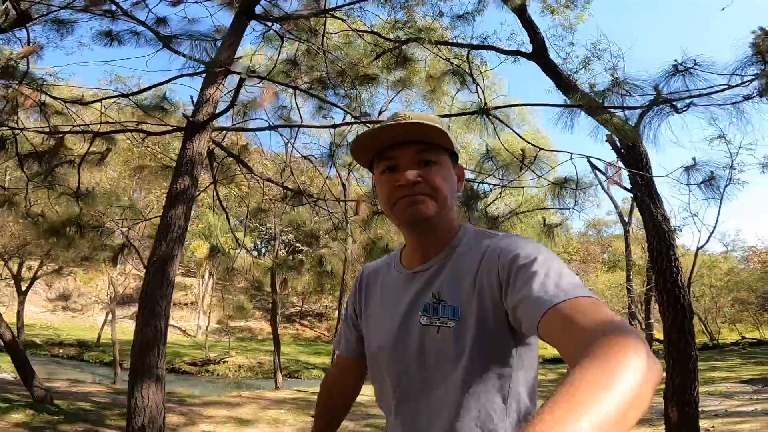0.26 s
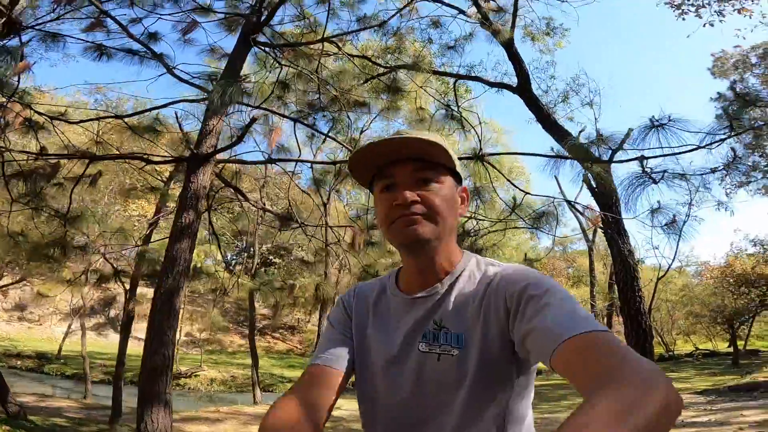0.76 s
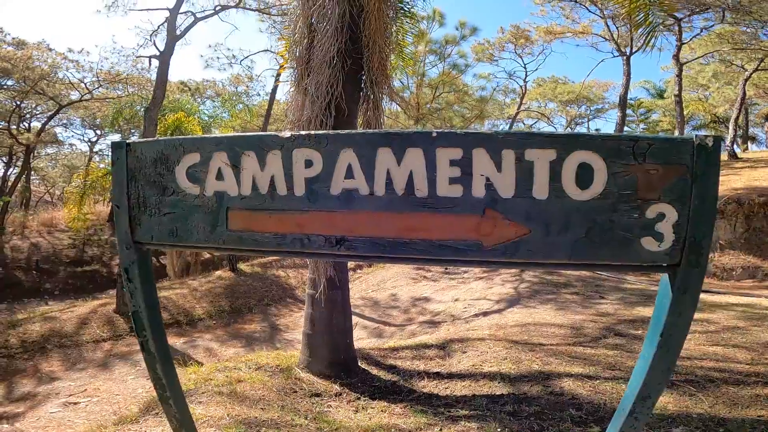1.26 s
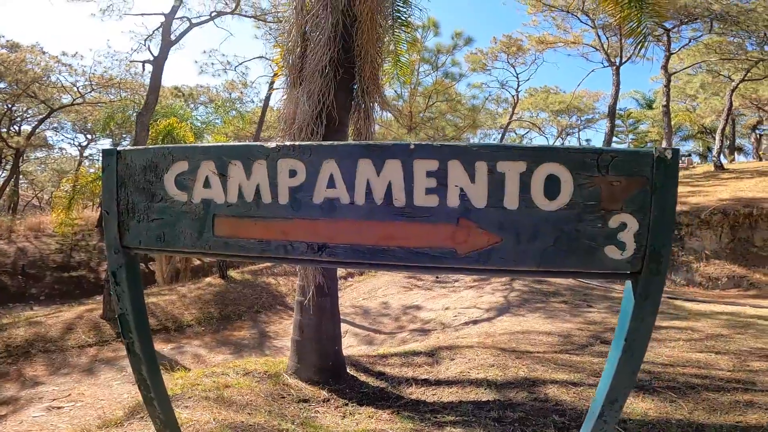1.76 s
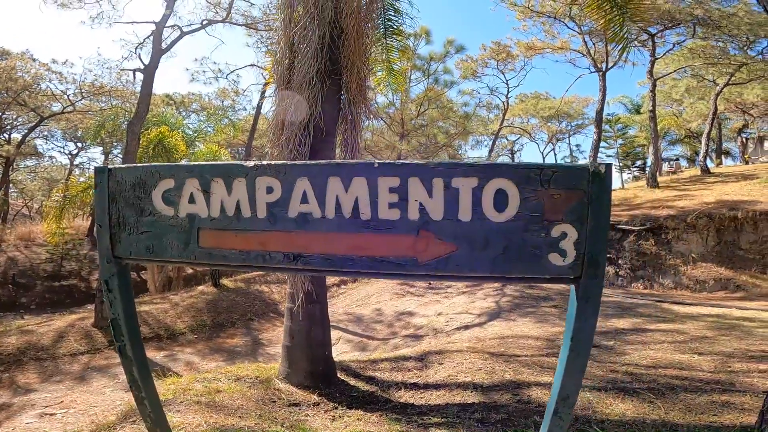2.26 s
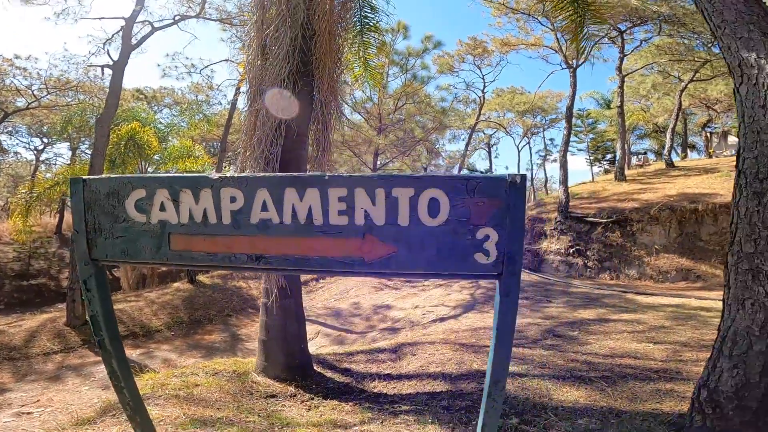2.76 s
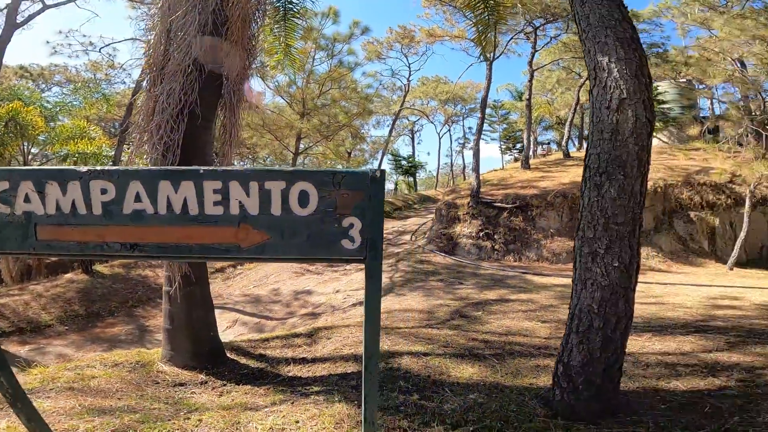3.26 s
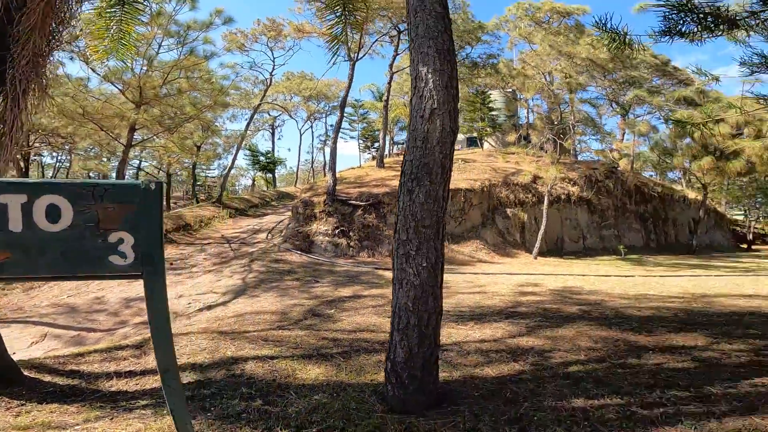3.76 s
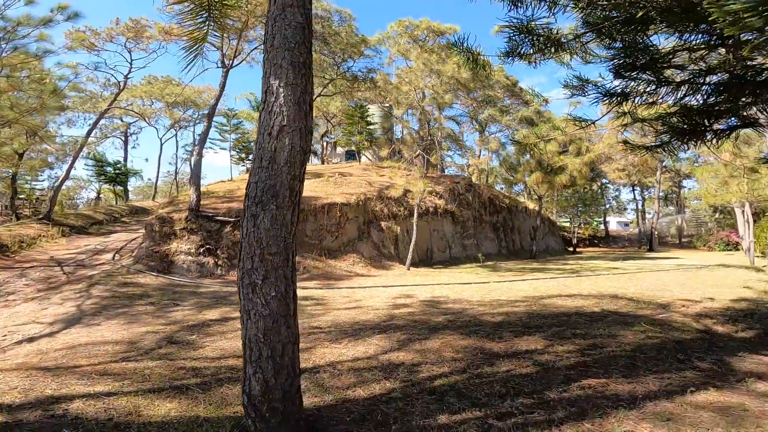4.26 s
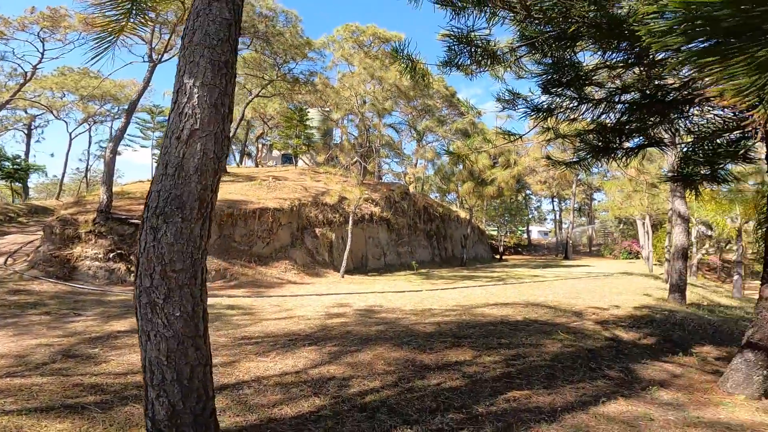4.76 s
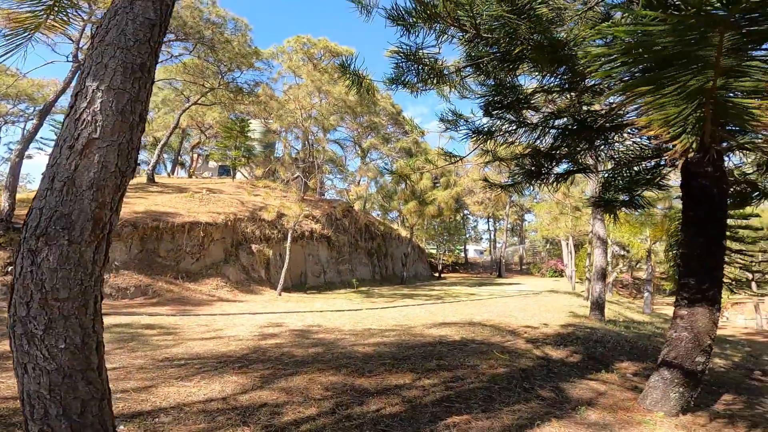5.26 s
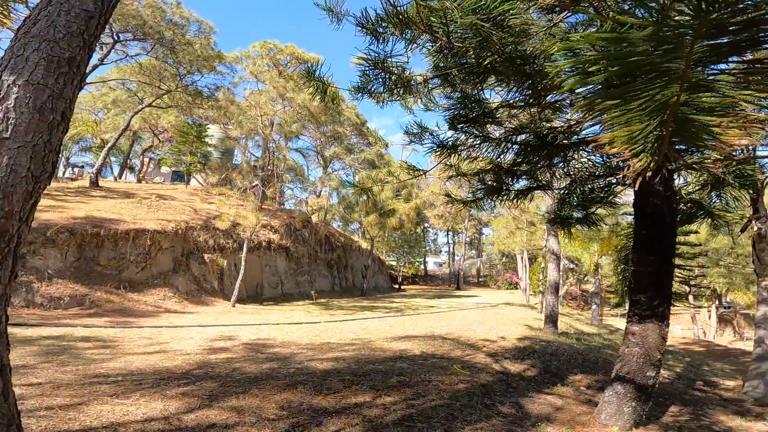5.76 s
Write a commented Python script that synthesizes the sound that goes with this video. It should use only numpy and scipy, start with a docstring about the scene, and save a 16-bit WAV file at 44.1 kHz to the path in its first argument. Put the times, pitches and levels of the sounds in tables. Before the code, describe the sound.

A small engine-driven water pump runs close to the microphone from the start, chugging fast and evenly. Its low exhaust puffs sit in the centre, while a ringing metal clatter and bright valve ticks come slightly from the left. At about 0.9 seconds the sound cuts off abruptly into silence. At about 1.1 seconds the pump returns from far across the park, much quieter, a soft low hum straight ahead that wavers slightly and continues to the end, at about 6 seconds. A soft gust in the pines comes in with it and dies away by about 2.5 seconds, leaving a low air rumble and light hiss. Two very faint, thin, high whistles rise and fall, around 1.4 to 2.2 seconds and 4.3 to 5 seconds. From about 4.5 seconds a faint dry rattle, perhaps an insect, slowly grows.

```python
"""A small engine-driven water pump chugs in a park: two puffs of gas and a burst of valve clatter a cycle.
The microphone stands close by at first, the ringing metal off to its left. The sound cuts off, and the
pump returns from far away, a soft hum straight ahead under a dying gust in the pines.
Two faint high whistles pass, and a dry rattle, perhaps an insect, grows near the end."""
import sys
import numpy as np
from scipy import signal
from scipy.fft import rfft, irfft, next_fast_len
from scipy.io import wavfile
from scipy.ndimage import uniform_filter1d, map_coordinates

SR = 44100
rng = np.random.default_rng(int(sys.argv[2]) if len(sys.argv) > 2 else 0)


def wav_record(signal):
    """Record a signal, one row per channel, as 16-bit PCM in the file named by sys.argv[1]."""
    frames = np.transpose(np.atleast_2d(signal))
    bounded = np.clip(frames, -1, 1)
    # unit amplitude maps onto the largest positive 16-bit level
    quanta = np.round(bounded * 32767).astype(np.int16)
    wavfile.write(sys.argv[1], SR, quanta)


N = 264952
TIME = np.arange(N) / SR

# when the close and the distant microphone positions are heard: time_s, gain
NEAR_FADE = [(.928, 1), (.944, 0)]
FAR_FADE = [(1.09, 0), (1.11, .1), (1.155, 1)]
# spectra of low wind and of fine treetop hiss: frequency_hz, level_db
RUMBLE_SPECTRUM = [(8, -3), (22, -8.5), (45, -3.5), (80, -7), (130, -11.5), (200, -16), (300, -44),
                   (600, -71.5)]
HISS_SPECTRUM = [(3500, -25), (6500, -2), (8000, -6), (9800, 2), (11000, 0), (12200, 5), (13000, -11),
                 (14000, -17)]
# metal contacts in each engine cycle: after_firing_cycles, level_db, t60_s
VALVE_CONTACTS = [(.272, -.3, .045), (.405, -5, .09), (.895, -10, .06)]


def amp(db):
    """Decibels to gain."""
    return 10 ** (np.asarray(db) / 20)


def unit(x):
    """Scale to rms 1."""
    return x / np.sqrt(np.mean(x ** 2) + 1e-20)


def along(points, hz):
    """Read (frequency_hz, value) points on a log axis."""
    knots_hz, values = np.transpose(points)
    return np.interp(np.log(hz + 1), np.log(knots_hz + 1), values)


def curve(points):
    """Read (time_s, value) points at every sample."""
    return np.interp(TIME, *np.transpose(points))


def wobble(rate):
    """A smooth random curve, rate knots a second."""
    return map_coordinates(rng.standard_normal(int(N * rate / SR) + 4), [TIME * rate])


def swell(peak_s, half_length_s):
    """A smooth bump from 0 to 1 and back."""
    return np.exp(-((TIME - peak_s) / half_length_s) ** 2)


def growing(start_s, rise_s, db, db_per_s):
    """A gain that fades in and keeps climbing."""
    return np.clip((TIME - start_s) / rise_s, 0, 1) * amp(db + db_per_s * (TIME - start_s))


def filtered(x, response):
    """x through a complex response of frequency."""
    size = next_fast_len(N + SR // 2)
    return irfft(rfft(x, size) * response(np.fft.rfftfreq(size, 1 / SR)), size)[..., :N]


def coloured(x, spectrum):
    """x given a spectrum, at rms 1."""
    return unit(filtered(x, lambda hz: amp(along(spectrum, hz))))


def rush(spectrum, patchy_db):
    """Noise of rms 1 with drifting patches of gain."""
    bins = signal.stft(rng.standard_normal(N), nperseg=512)[2]
    patches = uniform_filter1d(rng.standard_normal(bins.shape), size=6, axis=0)
    patches = unit(uniform_filter1d(patches, size=14, axis=1))
    return coloured(signal.istft(bins * amp(patchy_db * patches), nperseg=512)[1][:N], spectrum)


def blows(turns, scatter_db):
    """One impulse of uneven size each time the count passes a whole number."""
    at = np.flatnonzero(np.diff(np.floor(turns)) > 0)
    train = np.zeros(N)
    train[at] = amp(scatter_db * rng.standard_normal(len(at)))
    return train


def bursts(train, rise_s, t60_s):
    """The envelope that each impulse leaves: a quick rise and a decay."""
    t = TIME[:SR // 4]
    return signal.fftconvolve(train, (1 - np.exp(-t / rise_s)) * amp(-60 * t / t60_s))[:N]


def ebb(db_per_s):
    """A steady fall in dB, counted from the start of the distant scene."""
    return -db_per_s * (TIME - FAR_FADE[0][0])


def gust():
    """Wind strength in dB over the calm: one gust holds, then dies away."""
    held_db, hold_until_s, fall_db_per_s = 9.5, 1.32, 8.5
    return np.clip(held_db - fall_db_per_s * (TIME - hold_until_s), 0, held_db)


def wind_in_pines():
    """Air rumbles low down, rushes through the trees and hisses in the needles."""
    # spectra of the air in the trees and in the needles: frequency_hz, level_db
    breeze_spectrum = [(140, -18), (230, 2.5), (238, -15), (265, -3.5), (471, -1.5), (557, 0.5),
                       (716, -1.5), (1500, -12.5), (2000, -14.5), (4000, -31.5), (5200, -49), (8800, -120)]
    needle_spectrum = [(1200, -1.5), (2300, 1), (3300, -3), (4500, -5.5), (6500, -10.5), (8000, -15),
                       (10000, -23), (12300, -39), (14000, -42)]
    # light stirs that reach only the crowns: peak_s, half_length_s, level_db
    stirs = [(2.92, 0.1, 0.8), (3.556, 0.72, 3.5), (5.7, 1.45, 4.5)]
    gust_db, eddy_db = gust(), .5 * wobble(4.97)
    stir_db = sum(db * swell(peak_s, half_length_s) for peak_s, half_length_s, db in stirs)
    breeze_gain = amp(-56 + .89 * gust_db + eddy_db)
    rumble = amp(-48 + .15 * gust_db + ebb(db_per_s=.5)) * rush(RUMBLE_SPECTRUM, patchy_db=3.5)
    breeze = breeze_gain * rush(breeze_spectrum, patchy_db=1.4)
    needles = amp(-68.5 + .52 * gust_db + stir_db + eddy_db) * rush(needle_spectrum, patchy_db=1.5)
    treetops = amp(-97 + 2.4 * stir_db) * np.array([rush(HISS_SPECTRUM, patchy_db=1.5) for _ in range(2)])
    # near the end the air opens to both sides of the microphone
    side = breeze_gain * rush(breeze_spectrum, patchy_db=-1)
    side += amp(-49.5) * rush(RUMBLE_SPECTRUM, patchy_db=1)
    side *= growing(start_s=4.14, rise_s=.26, db=-31.5, db_per_s=9.5)
    return rumble + breeze + needles + treetops + np.array([side, -side])


def whistles():
    """Faint, fluttering tones arch high above the breeze and break into chirps, with a little hiss."""
    # thin whistles: start_s, length_s, top_hz, level_db
    arches = [(1.426, 0.81, 11700, -89), (4.25, 0.75, 11850, -89)]
    sag_hz, hiss_db = 2900, 3
    sound = np.zeros(N)
    for start_s, length_s, top_hz, db in arches:
        arch = 1 - np.clip(2 * (TIME - start_s) / length_s - 1, -1, 1) ** 2
        pitch_hz = (top_hz - sag_hz * (1 - arch)) * (1 + .01 * wobble(600) + .008 * wobble(30))
        flutter = wobble(90) * amp(2.5 * wobble(15))
        tone = unit(flutter * np.sin(2 * np.pi * np.cumsum(pitch_hz) / SR))
        hiss = amp(hiss_db) * rush(HISS_SPECTRUM, patchy_db=2)
        sound += amp(db) * (arch ** .25 * tone + arch * hiss)
    return sound


def rattle():
    """Dry ticks at an uneven rate over a narrow buzz, perhaps an insect."""
    # the band of the buzz: frequency_hz, level_db
    buzz_spectrum = [(2500, -42), (3500, -4), (4200, 2), (4900, -2.5), (5600, -9.5), (7000, -11.5),
                     (8500, -54), (12000, -39)]
    ticks_per_s = 28 * amp(2 * wobble(25))
    ticks = blows(np.cumsum(ticks_per_s) / SR, scatter_db=1.8)
    envelope = .28 + bursts(ticks, rise_s=.003, t60_s=.045)
    gain = growing(start_s=4.5, rise_s=.57, db=-72, db_per_s=3.6)
    return gain * coloured(envelope * rng.standard_normal(N), buzz_spectrum)


def engine_cycles(speed, firing_s):
    """Engine cycles counted from one firing."""
    turns = np.cumsum(curve(speed)) / SR
    return turns - np.interp(firing_s, TIME, turns)


def hum(turns, orders, unsteady_db, intake_lag, intake_share, shift_rad, pipe_order, half_width):
    """Exhaust and intake puff intake_lag cycles apart; orders lag as they pass the pipe's resonance."""
    note = np.zeros(N)
    for order, db in orders:
        puff_phase = np.angle(-1 - intake_share * np.exp(-2j * np.pi * order * intake_lag))
        phase = puff_phase + shift_rad - 2 * np.arctan((order - pipe_order) / half_width)
        note += amp(db + unsteady_db * wobble(7.5)) * np.cos(2 * np.pi * order * turns + phase)
    return unit(note)


def far_pump():
    """From afar only the low puffs reach the microphone, wavering and carried a little by the gust."""
    # engine speed: time_s, cycles_per_s
    speed = [(1.1, 19.43), (2.6, 19.43), (2.95, 19.59), (3.3, 19.47), (3.8, 19.46), (4.3, 19.38),
             (5.1, 19.4), (5.35, 19.2), (5.7, 19.42)]
    # the exhaust note at a distance: cycle_rate_multiple, level_db
    exhaust_orders = [(1, -11), (2, -7), (3, -1), (4, -6), (5, 0), (6, -5), (7, -10), (8, -1), (9, -11),
                      (10, -14), (11, -13), (12, -24), (13, -27), (14, -27)]
    turns = engine_cycles(speed, firing_s=1.3053)
    note = hum(turns, exhaust_orders, unsteady_db=.5,
               intake_lag=.357, intake_share=.96, shift_rad=-2.52, pipe_order=9.7, half_width=.5)
    return amp(-40.5 + ebb(db_per_s=.5) + .13 * gust()) * note


def to_left(pair):
    """Place a stereo pair to the left of the microphone, at rms 1."""
    # balance of the close metal: frequency_hz, left_minus_right_db
    balance = [(150, 0.9), (360, 3), (660, 7), (1200, 6.5), (2180, 8.5), (3970, 6), (7230, 2.6),
               (13200, 6.7)]
    return unit(filtered(pair, lambda hz: amp(np.outer([.5, -.5], along(balance, hz)))))


def engine_block(hz):
    """The response of the ringing block: resonances of alternating sign."""
    # block resonances: centre_hz, width_hz, level_db
    resonances = [(710, 120, 4), (964, 23, 1.5), (1470, 160, -5), (1980, 100, 15.5), (3120, 70, -7.5),
                  (4000, 37, -17.5), (4560, 170, 1), (5460, 66, -21), (6900, 100, -15), (7660, 30, -21)]
    return sum((-1) ** k * amp(db) * 1j * hz * width / (centre ** 2 - hz ** 2 + 1j * hz * width)
               for k, (centre, width, db) in enumerate(resonances))


def metal_modes(train, t60_s, count):
    """Each blow sets a new handful of the many close modes of the metal parts ringing."""
    t = TIME[:SR // 16]
    envelope = amp(-60 * t / t60_s) * np.minimum(t / .001, 1)
    sound = np.zeros((2, N + len(t)))
    for at in np.flatnonzero(train[:round(NEAR_FADE[-1][0] * SR)]):
        hz = rng.uniform(1200, 8000, (count, 1))
        sizes = rng.exponential(size=(2, count))
        phase = rng.uniform(0, 2 * np.pi, (count, 1))
        sound[:, at:at + len(t)] += train[at] * sizes @ np.sin(2 * np.pi * hz * t + phase) * envelope
    return sound[:, :N] / np.sqrt(count)


def valve_clatter(turns, puffs):
    """Valve gear rattles over the steady churn of the pump and rings the block."""
    # spectrum of the clatter: frequency_hz, level_db
    clatter_spectrum = [(260, -14.5), (450, -6.5), (519, -7), (690, -4.5), (843, -7), (958, -6),
                        (1330, -4.5), (1450, -4), (2710, -8.5), (3040, -6), (4730, -10), (7580, -14),
                        (10200, -27), (12000, -25), (13600, -42.5)]
    # how alike left and right are at the microphone: frequency_hz, correlation
    likeness = [(300, -0.2), (600, 1), (1310, 1), (2820, 0.5), (6090, 0.9), (13200, -0.2)]
    # where the casing sings: cycle_rate_multiple, level_db
    casing_orders = [(25, -7), (32, -4.5), (33, -4.5), (35, -6), (37, -3), (39, -1), (49, 4.5), (51, -1),
                     (77, -11)]
    churn_db, modes_db, ring_db, knock_db = -11, -7.5, -7, -13.5

    def mid_side_gains(hz):
        spread = np.arccos(np.clip(along(likeness, hz), -1, 1)) / 2
        return np.array([np.cos(spread), np.sin(spread)])

    trains = [amp(db) * blows(turns - delay, scatter_db=.9) for delay, db, _ in VALVE_CONTACTS]
    power = sum(bursts(train, rise_s=.0012, t60_s=t60_s) ** 2
                for train, (_, _, t60_s) in zip(trains, VALVE_CONTACTS))
    grit = np.sqrt(power + amp(churn_db) ** 2) * amp(1.5 * wobble(500)) * rng.standard_normal((2, N))
    grit += amp(modes_db) * metal_modes(trains[0], t60_s=.07, count=30)
    pair = coloured(grit, clatter_spectrum) + amp(ring_db) * unit(filtered(grit, engine_block))
    mid, side = filtered(pair, mid_side_gains)
    # knocks and casing repeat alike in every cycle, so they sound as tones among the noise
    knocks = unit(filtered(sum(trains), lambda hz: engine_block(hz) / (1 + 1j * hz / 900)))
    casing = hum(turns, casing_orders, unsteady_db=-1, **puffs)
    mid += amp(knock_db) * (knocks + casing)
    return to_left(np.array([mid + side, mid - side]))


def valve_snap(turns):
    """The valve shuts with a short, bright tick on the first contact of each cycle."""
    # spectrum of the tick: frequency_hz, level_db
    snap_spectrum = [(1500, -30.5), (3000, -11), (4700, 4), (7500, -3), (10000, -21.5), (12200, -14.5),
                     (13600, -32)]
    shuts = blows(turns - VALVE_CONTACTS[0][0], scatter_db=2)
    grit = rng.standard_normal(N) + .5 * rng.standard_normal((2, N))
    return to_left(coloured(bursts(shuts, rise_s=.0004, t60_s=.02) * grit, snap_spectrum))


def exhaust_chuff(turns):
    """Gas rushes out of the pipe as the valve opens, a little ahead of the puff's peak."""
    # spectrum of the rushing gas: frequency_hz, level_db
    gas_spectrum = [(120, -22.5), (250, -1), (340, -6.5), (480, -6), (800, -18), (1400, -32), (3000, -63)]
    envelope = bursts(blows(turns + .12, scatter_db=3), rise_s=.00053, t60_s=.1)
    return coloured(envelope * rng.standard_normal(N), gas_spectrum)


def near_pump():
    """Close by, the puffs thump and chuff and the metal clatters; wind stirs at each microphone port."""
    # engine speed: time_s, cycles_per_s
    speed = [(0, 19.5), (.3, 19.55), (.55, 19.65), (.9, 19.42)]
    # the exhaust note close up: cycle_rate_multiple, level_db
    exhaust_orders = [(1, -27), (2, -8), (3, -9), (4, -11), (5, 0), (6, -6), (7, -4), (8, -1), (9, -9),
                      (10, -7), (11, -9), (12, -18), (13, -17), (14, -21), (15, -32), (16, -18), (17, -26),
                      (18, -27), (19, -26), (20, -30), (21, -28)]
    puffs = dict(intake_lag=.381, intake_share=.52, shift_rad=-3.23, pipe_order=10.9, half_width=.9)
    hollow_hz, hollow_width_hz = 688, 150
    sway = swell(peak_s=.67, half_length_s=.33)  # the microphone sways once towards the pump
    closer_db = 1.5 * sway
    turns = engine_cycles(speed, firing_s=.0326)
    thump = amp(-23.5 + closer_db) * hum(turns, exhaust_orders, unsteady_db=.83, **puffs)
    chuff = amp(-46.5 + closer_db) * exhaust_chuff(turns)
    gas = (thump + chuff) * amp([[.1], [-.1]])  # almost dead centre
    clatter = amp(-36 + .94 * closer_db) * valve_clatter(turns, puffs)
    snap = amp(-45.5) * valve_snap(turns)
    # a hollow ring of the casing comes and goes with the sway
    hollow = unit(filtered(clatter, lambda hz: 1 / (1 + 2j * (hz - hollow_hz) / hollow_width_hz)))
    port_wind = np.array([rush(RUMBLE_SPECTRUM, patchy_db=-.5), rush(RUMBLE_SPECTRUM, patchy_db=1)])
    return gas + clatter + snap + amp(-51) * sway * hollow + amp(-43.5) * port_wind


def scene():
    """The pump close up, a moment of silence, then the pump far off across the park."""
    distant = far_pump() + wind_in_pines() + rattle() + whistles()
    return curve(NEAR_FADE) * near_pump() + curve(FAR_FADE) * distant


def record(dry):
    """The camera keeps nothing above its band limit."""
    top_hz = 14400
    return filtered(dry, lambda hz: 1 / np.sqrt(1 + (hz / top_hz) ** 120))


dry = scene()
out = record(dry)
wav_record(out)
```